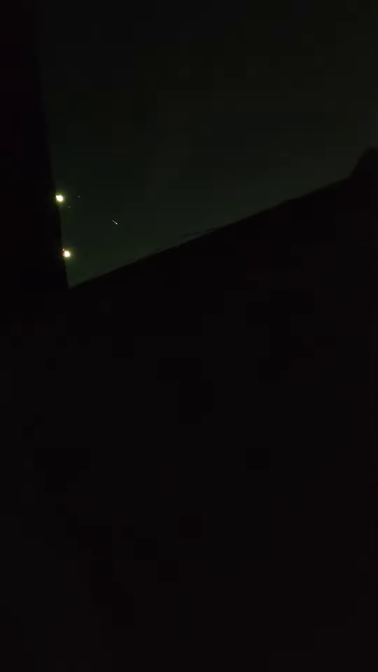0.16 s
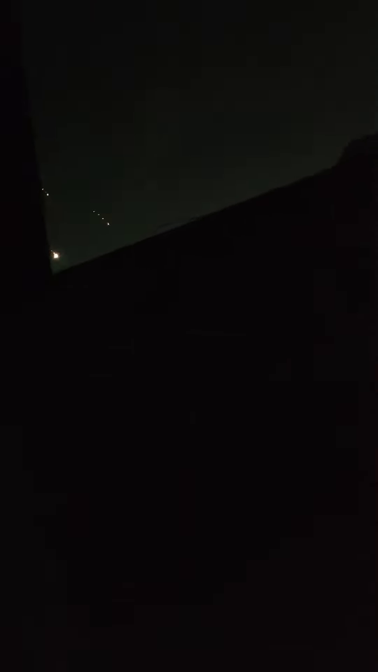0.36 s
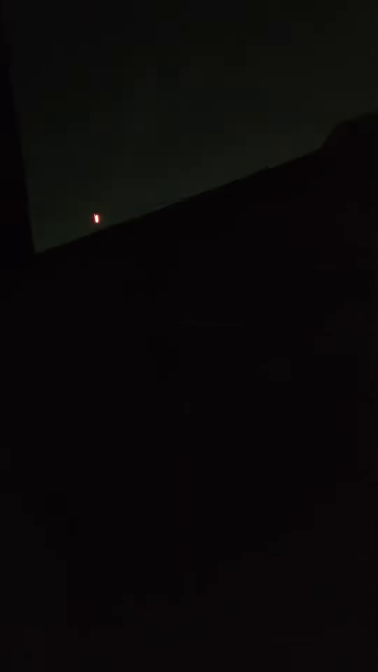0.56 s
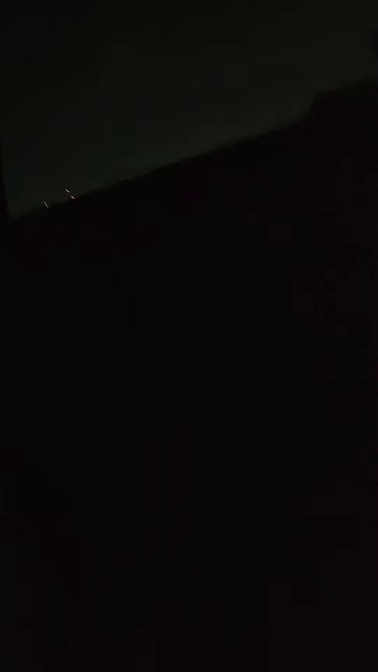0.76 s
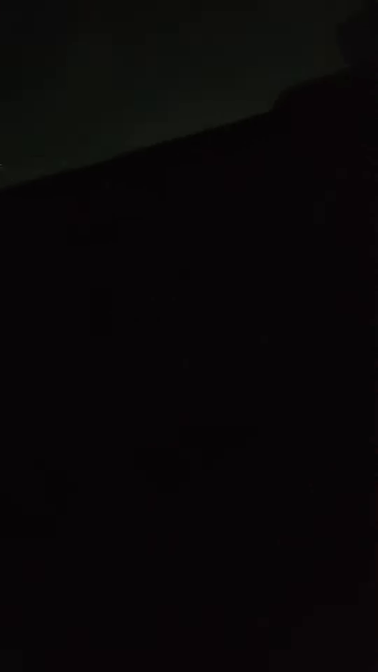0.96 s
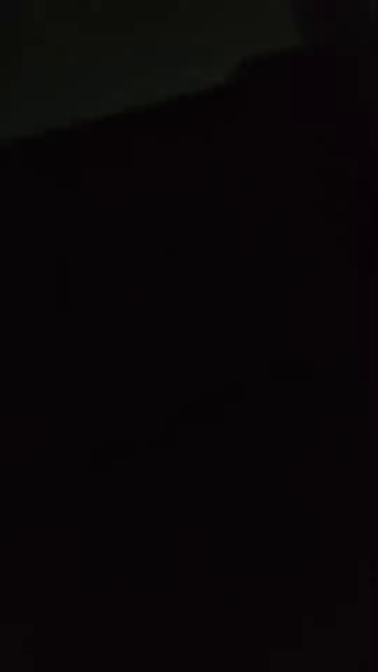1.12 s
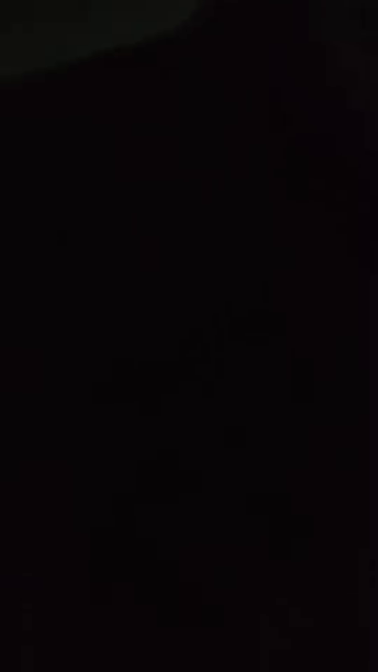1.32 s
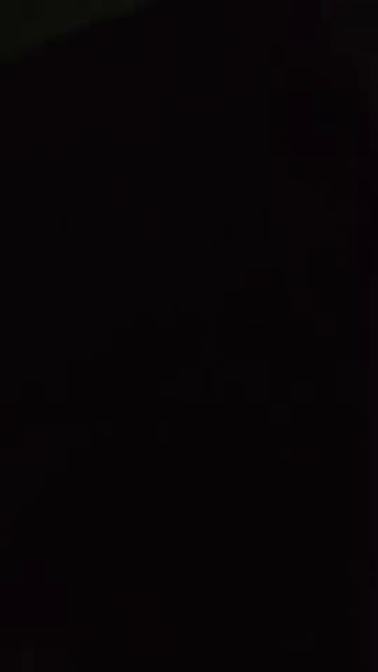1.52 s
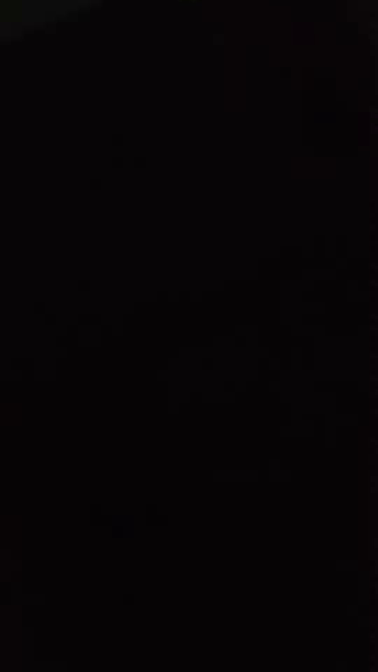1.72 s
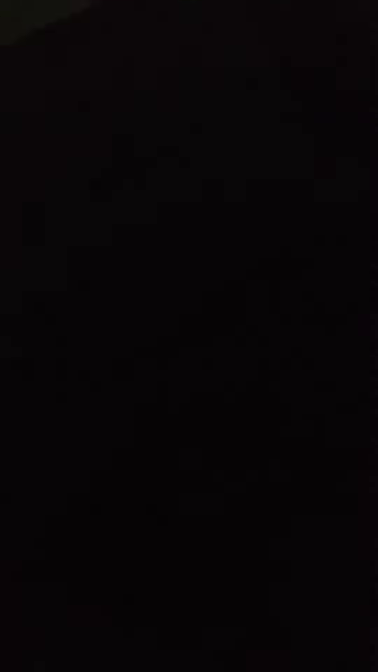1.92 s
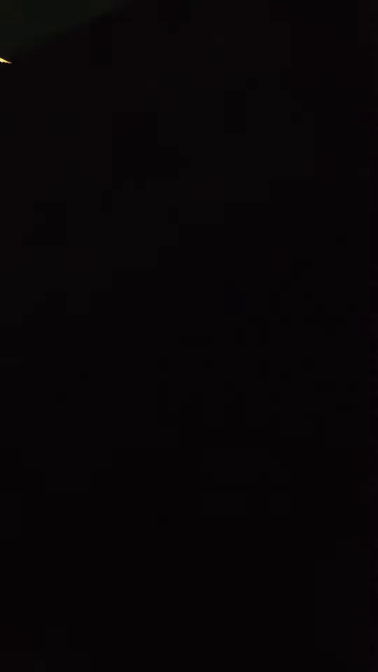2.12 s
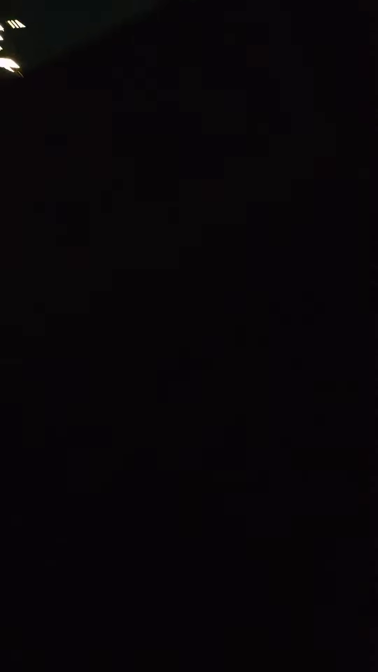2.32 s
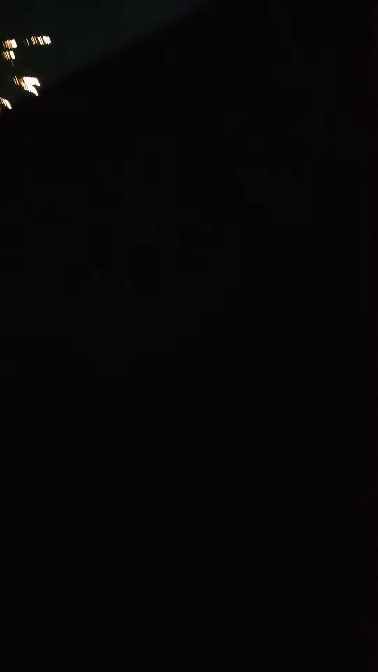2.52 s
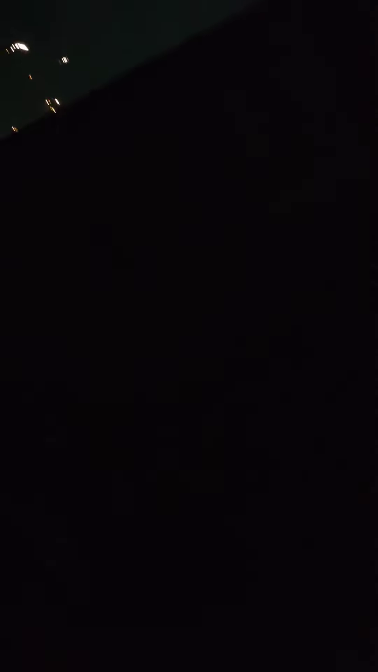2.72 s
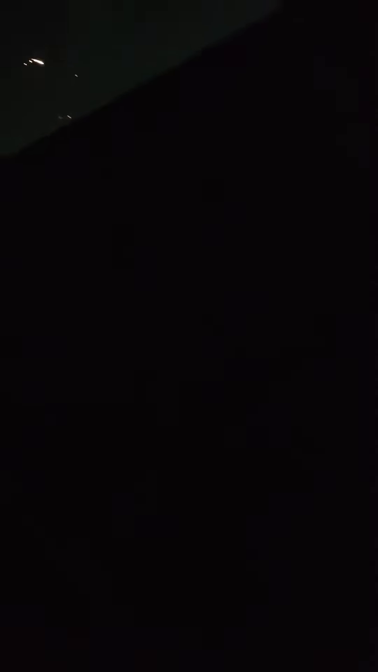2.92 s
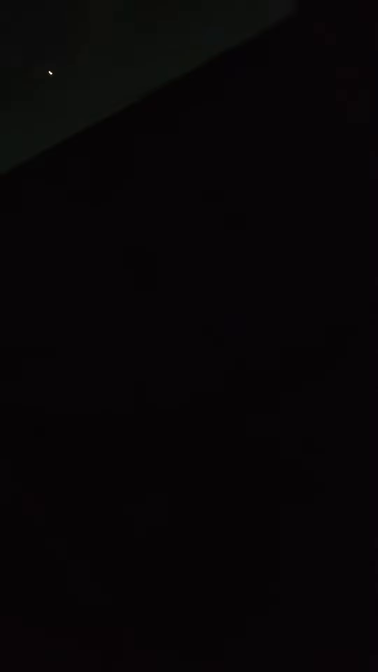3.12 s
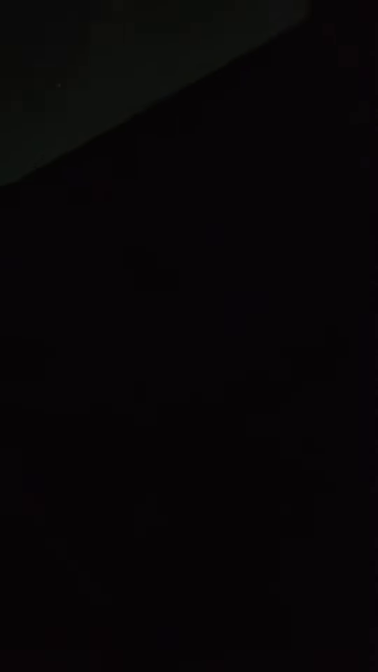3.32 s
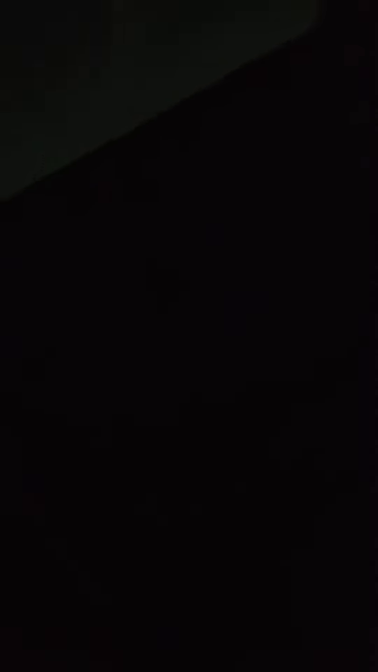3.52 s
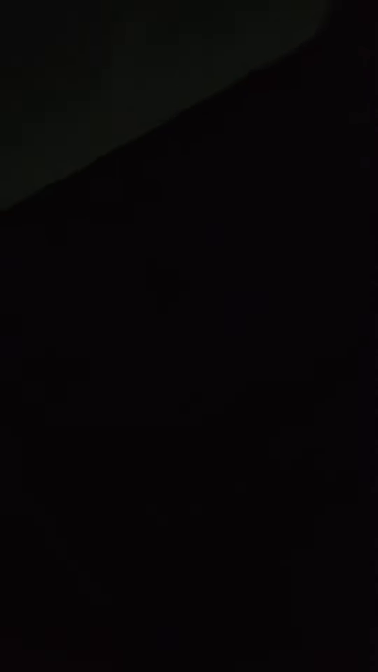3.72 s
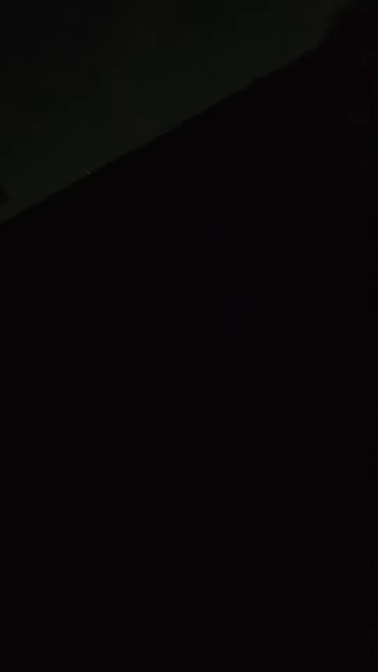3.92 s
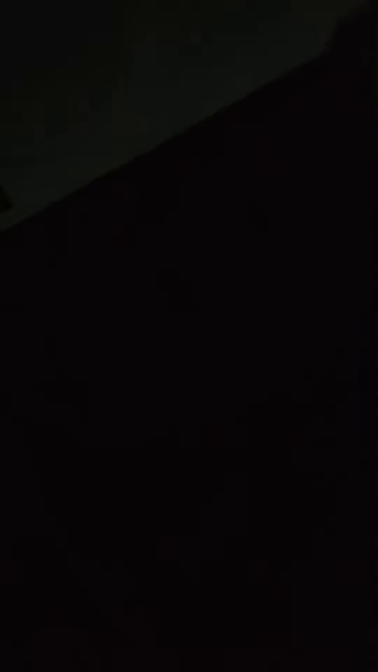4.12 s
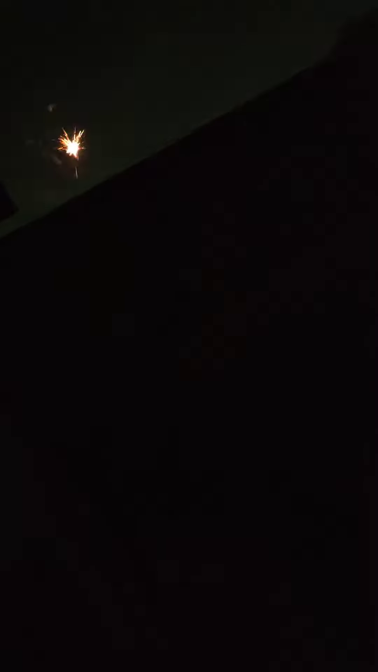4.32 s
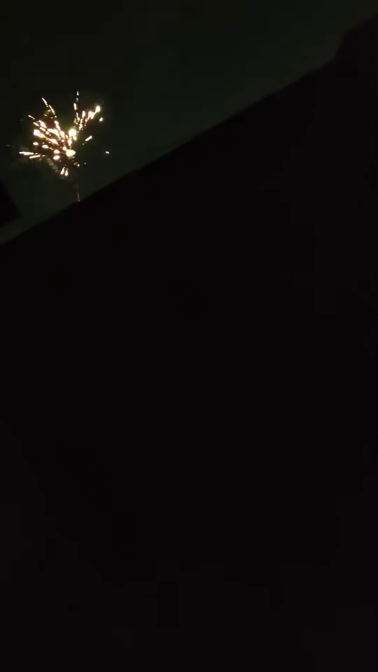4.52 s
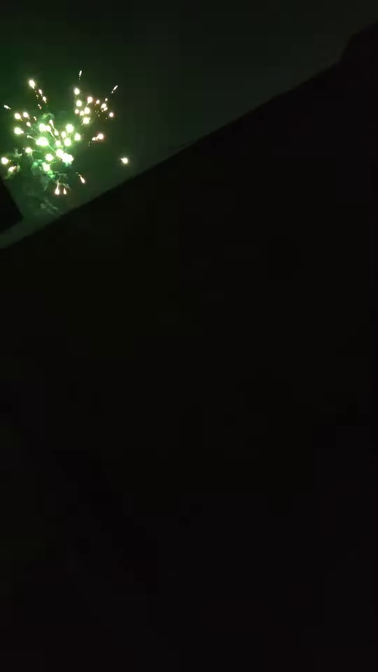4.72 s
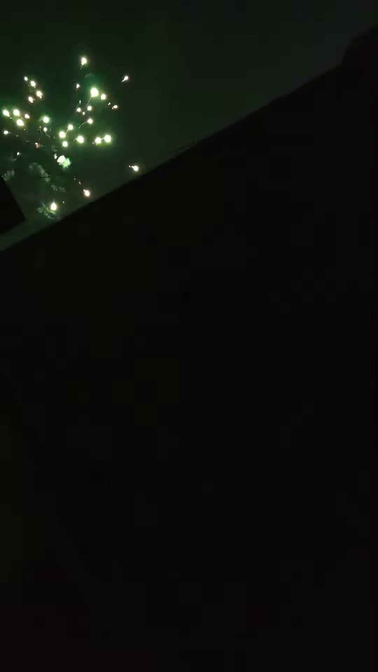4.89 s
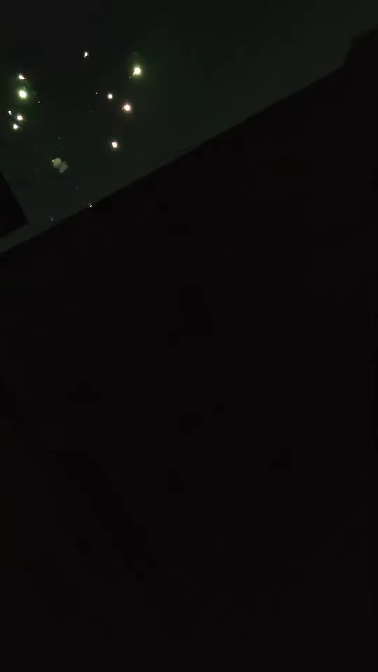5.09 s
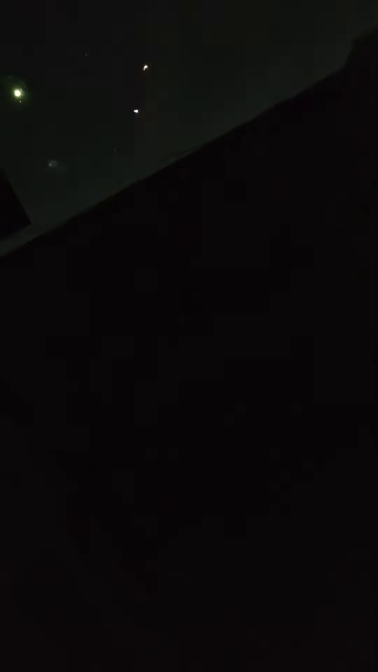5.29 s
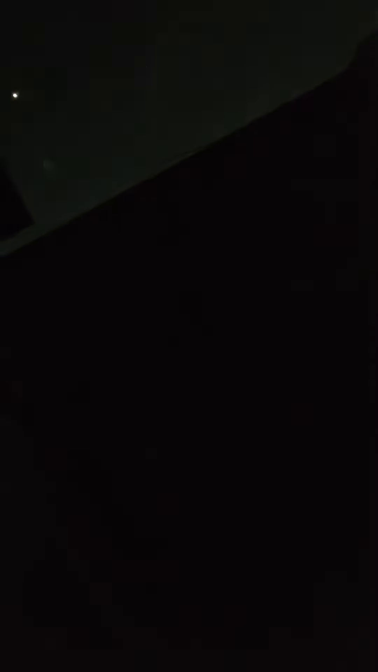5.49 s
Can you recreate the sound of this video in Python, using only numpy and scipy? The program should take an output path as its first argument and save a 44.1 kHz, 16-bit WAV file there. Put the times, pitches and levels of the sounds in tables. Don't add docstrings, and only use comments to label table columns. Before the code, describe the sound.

Hand-held phone outdoors between blocks of flats. First fading echo tail, faint drone and a car's tyre hiss receding, then scratchy handling, clicks and a brief squeak close up. A sharp, clipping aerial bang follows, with rapid wall slaps and a bright swarm of reflections decaying into low rumble and faint far pops. Another, heavier bang repeats the pattern and is still echoing at the end.

```python
import sys
import numpy as np
from scipy import signal
from scipy.fft import rfft, irfft, next_fast_len
from scipy.io import wavfile
from scipy.ndimage import uniform_filter1d

SR = 44100
rng = np.random.default_rng(int(sys.argv[2]) if len(sys.argv) > 2 else 0)


def unload_wav(signal):
    wavfile.write(
        sys.argv[1],
        SR,
        np.round(np.clip(np.atleast_2d(signal).T, -1, 1) * 32767).astype(np.int16),
    )


def ratio_of_db(decibels):
    return 10 ** (np.asarray(decibels, float) / 20)


N = 244755

# direct_boom_db, crack_minus_boom_db, echo_level_db, echo_brightness_db
BURSTS = [
    (0, -8, -1.5, -1.5),
    (0.5, -6, 0, 0.5),
    (2.5, -9.5, 0, 0),
]
BURST_S = [
    -1.297,
    1.937,
    4.513,
]


def band(x, lo_hz, hi_hz, order=2):
    return signal.sosfilt(signal.butter(order, [lo_hz, min(hi_hz, .45 * SR)], "band", fs=SR, output="sos"), x)


def unit(x):
    return x / np.sqrt(np.mean(x ** 2))


def sides(pan_db):
    return ratio_of_db(np.array([pan_db, -pan_db]) / 2).reshape(2, -1)


def colour(table, hz):
    return np.interp(np.log(hz), np.log(np.array(table)[:, 0]), np.array(table)[:, 1])


def walk(rate_hz):
    k = int(SR / rate_hz)
    held = np.repeat(rng.standard_normal(N // k + 1), k)
    return 1.207 * uniform_filter1d(uniform_filter1d(held, k), k)[:N]


def arrivals(at, size, lag, length):
    out = np.zeros((2, length + 64))
    for side, shift in zip(out, (lag / 2, -lag / 2)):
        np.add.at(side, np.clip(at + 16 + shift, 0, length).astype(int), size)
    return out[:, 16:length + 16]


def add(out, s, piece):
    i = int(s * SR)
    out[:, i:i + piece.shape[1]] += piece[:, :N - i]


def scattered_shock(crack_db, sizzle_db, hz):
    scatter_ms = 3.3
    u = rng.random((160, 3)).T
    late = -np.log(u[0]) * scatter_ms * SR / 1000
    size = np.where(u[1] < .3, -1, 1) * (1.8 + u[1])
    late[:8] *= .04
    late[60:] *= 4.0
    size[60:] *= .25
    hits = arrivals(late, size, 12 + 10 * (2 * u[2] - 1), 8192)
    n_wave = np.linspace(1, -1, int(.65 * SR / hz))
    boom = band(signal.lfilter(n_wave, 1, hits), hz / 1.35, hz * 2.8)
    crack = band(band(hits, 900, 2600, order=1), 700, 7000)
    sizzle = band(hits, 6000, 18000)
    layers = (boom, 0), (crack, crack_db + 4), (sizzle, sizzle_db + 2.5)
    return sum(ratio_of_db(db) * x / np.abs(x).max() for x, db in layers)


def fronts():
    # delay_s, boom_db, crack_minus_boom_db, sizzle_minus_boom_db, boom_hz
    walls = [(.017, -0.5, -17, -33, 390), (.056, 1, -7, -11.5, 597), (.075, -4.5, -6.5, -25, 282),
             (.116, -7.5, -6.5, -16, 560), (.177, -10.5, -23, -28, 506), (.237, -8, -11, -36, 520),
             (.443, -15, -17.5, -31.5, 530), (.530, -10, -12.5, -42, 520), (.662, -13.5, -13.5, -60, 340),
             (1.554, -16.5, -21, -38, 320), (1.599, -27.5, -29, -38, 410), (1.617, -22.5, -15, -36, 294),
             (1.660, -24, -17, -45, 340)]
    # start_s, boom_db, crack_minus_boom_db, boom_hz
    strays = [(0.485, -35.5, -0.5, 596), (1.964, -6.5, -6, 770), (2.0, -7.5, -4.5, 690),
              (2.043, -10.5, -11, 292), (3.083, -28, -10, 570), (3.119, -29, -9, 550),
              (3.3, -18.5, -20.5, 596), (3.378, -26, -15, 446), (3.425, -34, -12, 400),
              (3.439, -27.5, -6, 500), (3.689, -40, -21, 367), (4.279, -40, -17, 568),
              (4.297, -38, -3.5, 700), (4.377, -42, -9, 700), (4.46, -36, -17, 372),
              (4.545, -3.5, -11, 530), (4.629, -3.5, -11.5, 543), (4.646, -7.5, -31, 506),
              (5.155, -16, -6.5, 513), (5.207, -13, -11, 646), (5.383, -12.5, -18, 270)]
    stray_sizzle_db, direct_sizzle_db, direct_hz = -31, -14.5, 340
    out = np.zeros((2, N))
    rows = [(s, db, crack_db, stray_sizzle_db, hz) for s, db, crack_db, hz in strays]
    for s, (direct_db, crack_db, echo_db, _) in zip(BURST_S, BURSTS):
        rows.append((s, direct_db, crack_db, direct_sizzle_db, direct_hz))
        rows += [(s + lag, db + echo_db, *tone) for lag, db, *tone in walls]
    for s, boom_db, *tone in rows:
        if 0 <= s < N / SR:
            level_db = boom_db + .5 * max(boom_db + 12.0, 0)
            add(out, s, scattered_shock(*tone) * ratio_of_db(level_db) * sides(0.48))
    return out


def echo_power(t, hz):
    # delay_s, level_db
    district = [(0, -17.5), (.18, -20.5), (.33, -22), (.45, -24), (.66, -25), (.83, -31.5), (1.1, -36.5),
                (1.32, -42.5), (1.48, -39.5), (1.58, -37), (1.68, -40.5), (1.85, -46), (2.2, -54),
                (3.2, -51)]
    # pitch_hz, first_db, slope_db_per_s, lowest_db
    air = [(110, -7, -22, -15.5), (451, -5, 0, -5), (2510, -18, -1, -20), (7600, -31, -22.5, -47.5)]
    # delay_s, level_db, fade_db_per_s
    far_blocks = [
        (.87, -34.5, -57),
        (1.21, -39, -72),
        (1.57, -34.5, -74),
    ]
    # start_s, level_db, fade_db_per_s, brightness_db
    far_shells = [
        (-.01, -33, -90, 3.5),
        (-.01, -44, -11, 7.5),
        (4.27, -43, -32, -9),
        (5.24, -41, 10, 7),
    ]
    rumble_hz, rumble_db_per_octave, rumble_rise_db_per_s = 320, -11, 155

    def through_air(age):
        total = 0
        for i, (_, first_db, slope, lowest_db) in enumerate(air):
            weight = colour([(row[0], j == i) for j, row in enumerate(air)], hz)
            total = total + weight * np.maximum(first_db + slope * age, lowest_db)
        return total

    treble = np.clip(np.log(hz / air[1][0]) / np.log(air[2][0] / air[1][0]), 0, 1.7)
    power = 0
    for s, (_, _, echo_db, bright_db) in zip(BURST_S, BURSTS):
        decay_db = np.interp(t - s, *np.transpose(district)) + through_air(t - s)
        power = power + (t >= s) * ratio_of_db(decay_db + echo_db + treble * bright_db) ** 2
        for lag, db, fade in far_blocks:
            age = t - s - lag
            swell_db = np.minimum(fade * age, rumble_rise_db_per_s * age)
            tilt_db = rumble_db_per_octave * abs(np.log2(hz / rumble_hz))
            power = power + ratio_of_db(db + echo_db + swell_db + tilt_db) ** 2
    for s, db, fade, bright_db in far_shells:
        level_db = db + fade * (t - s) + treble * bright_db + through_air(N / SR)
        power = power + (t >= s) * ratio_of_db(level_db) ** 2
    return power


def swarm():
    # pitch_hz, level_db
    swarm_colour = [(30, -17.5), (60, -5), (120, 0), (220, -2), (320, 0), (520, 1), (800, 3), (1200, 2.5),
                    (1800, 1.5), (3000, 6.5), (5000, 8.5), (8000, 11.5), (14000, -3)]
    t, out, size_fft = np.arange(N) / SR, 0, next_fast_len(N)
    u = rng.random((60000, 5)).T
    size = np.sign(u[1] - .5) * ratio_of_db(np.minimum(-2.2 * np.log(u[2]), 14))
    grains = rfft(arrivals(u[0] * N, size, 11 + 24 * (u[3] + u[4] - 1), N), size_fft)
    octave = np.log2(np.arange(grains.shape[1]) * SR / size_fft + 1)
    patch = walk(24.83)
    for hz in 35 * 2 ** np.arange(0, 9, .5):
        gain = np.repeat(np.sqrt(echo_power(t[::16], hz)), 16)[:N]
        window = np.cos(np.pi * np.clip(octave - np.log2(hz), -.5, .5)) ** 2
        part = irfft(grains * window, size_fft)[:, :N]
        level_db = colour(swarm_colour, hz) + min(hz / 700, 1) * 1.96 * patch + 0.48 * walk(20)
        out = out + gain * ratio_of_db(level_db) * unit(part)
    return out * sides(-0.16)


def rustle():
    # peak_s, level_db, build_up_db_per_s, low_minus_high_band_db, left_minus_right_db
    strokes = [(0.0, -67, 100, 12, -5), (.21, -62, 150, 6, 5), (.31, -60, 40, 2, 5), (.70, -74, -4, 1, -1),
               (.832, -64, 190, -3, 4), (1.006, -61.5, 120, -0.5, 4), (1.082, -57.5, 70, -1, 2),
               (1.348, -50.5, 79, 1, 0.5), (1.445, -63.5, 55, 4.5, 3), (1.465, -67, 100, 11, 2),
               (1.75, -71, 40, 13, 0)]
    stop_db_per_s = 152
    t = np.arange(N) / SR
    rub = rng.standard_normal((2, N)) * ratio_of_db(2.0 * rng.exponential(size=(2, N)))
    high = unit(band(rub, 6100, 20300))
    low = unit(band(rub, 3400, 5800, order=1))
    power = np.zeros((2, 2, N))
    for s, db, build, low_db, pan_db in strokes:
        shape_db = np.minimum(build * (t - s), stop_db_per_s * (s - t) - 60 * (t > s + 1))
        gain = ratio_of_db(db + shape_db) * sides(pan_db)
        power += gain ** 2 * ratio_of_db(np.array([0, low_db - 2.5]))[:, None, None] ** 2
    return (np.sqrt(power[0]) * high + np.sqrt(power[1]) * low) * ratio_of_db(walk(73))


def handling():
    # start_s, peak_db, body_minus_peak_db, left_minus_right_db
    ticks = [(0.1999, -40, -11, -3), (0.2433, -41, -11, 8), (0.284, -35, -9, 1.5), (0.338, -42, -8, -4),
             (1.143, -55, 9, 5), (1.4363, -36.5, -3, -11), (1.4557, -41, -1, -1)]
    # start_s, pitch_hz, level_db, t60_s, left_minus_right_db
    knocks = [
        (1.124, 95, -18, .09, 5),
        (1.585, 830, -40, .07, 3),
        (1.02, 1400, -52, .3, 0),
    ]
    # pitch_hz, level_db
    squeak = [(1200, -43), (1280, -41), (1930, -49), (2570, -49)]
    squeak_s = 1.625
    out, age = np.zeros((2, N)), np.arange(4096) / SR
    for s, peak_db, body_db, pan_db in ticks:
        decay = np.exp(-age / 0.00043) + 0.076 * np.exp(-age / .006)
        burst = rng.standard_normal((2, len(age))) * decay
        body = ratio_of_db(body_db + 14) * band(burst, 700, 6800, order=1)
        add(out, s, ratio_of_db(peak_db - 2.0) * sides(pan_db) * (band(burst, 6400, 25000) + body))
    for s, hz, db, t60, pan_db in knocks:
        ring = np.sin(2 * np.pi * hz * age) * (1 - np.exp(-age / .008)) * ratio_of_db(-60 * age / t60)
        add(out, s, ratio_of_db(db) * sides(pan_db) * ring)
    rough = 0.83 + 0.5 * unit(band(rng.standard_normal(len(age)), 40, 230))
    swell = age / 0.024 * np.exp(1 - age / 0.014) * rough
    tone = sum(ratio_of_db(db) * np.sin(2 * np.pi * hz * age) for hz, db in squeak)
    add(out, squeak_s, sides(2.5) * swell * tone)
    return out


def engine_drone():
    # time_s, level_db
    drone_level = [
        [(0, -41), (1.9, -41.5)],
        [(2.6, -42), (4.45, -43)],
    ]
    s, db = np.transpose(np.vstack(drone_level))
    phase = np.cumsum(65 + 1.5 * walk(3)) * 2 * np.pi / SR
    mid, side = band(rng.standard_normal((2, N)), 70.1, 74.4)
    drone = np.sin(phase) * ratio_of_db(1.5 * walk(20)) + .3 * unit(mid) + .2 * unit(side) * np.array([[1], [-1]])
    return ratio_of_db(np.interp(np.arange(N) / SR, s, db)) * unit(drone)


def tyres():
    start_db, fade_db_per_s = -44.5, -10
    noise = unit(band(rng.standard_normal((2, N)), 950, 1440, order=3))
    return noise * ratio_of_db(start_db + fade_db_per_s * np.arange(N) / SR)


def murmur():
    # pitch_hz, level_db_per_hz
    town_spectrum = [(15, -38), (25, -17), (78, 0.5), (134, -5), (394, -11.5), (463, -30), (624, -25),
                     (1330, -24), (5880, -48.5), (14000, -70.5), (16000, -72)]
    out = 0
    for hz in 30 * 2 ** np.arange(0, 9.5, .5):
        mid, side = band(rng.standard_normal((2, N)), hz / 2 ** 0.33, hz * 2 ** 0.22)
        width = np.clip(0.043 + hz / 900, 0, 1)
        level_db = colour(town_spectrum, hz) + 0.5 * walk(7.9)
        out = out + ratio_of_db(level_db) * (mid + width * side * np.array([[1], [-1]]))
    return ratio_of_db(-43) * unit(out)


def scene():
    return fronts() + swarm() + rustle() + handling() + engine_drone() + tyres() + murmur()


def top_cut(x):
    return signal.sosfilt(signal.butter(12, 16970, fs=SR, output="sos"), x)


def record(dry):
    # start_s, push_full_scale, length_s, slip_full_scale
    shoves = [
        (1.9367, -2.0, .056, 0),
        (1.9577, -.8, .035, .5),
        (4.5698, -.85, .04, 0),
    ]
    stop, ceiling = .95, .93
    coupling_hz, hiss_db, top_hz = 49.6, -75, 16000
    push, slip = np.zeros((2, 2, N))
    for s, depth, length, shift in shoves:
        age = np.arange(N) / SR - s
        onset = np.clip(age / .0004, 0, 1)
        push[1] += depth * onset * np.clip(1 - (age / length) ** 2, 0, 1)
        slip[1] += shift * onset * np.clip((length - age) / .009, 0, 1)
    x = np.clip(dry + push, slip - stop, stop)
    for hz in (coupling_hz, 14):
        x = signal.sosfilt(signal.butter(1, hz, "high", fs=SR, output="sos"), x)
    x = x / (1 + (x / ceiling) ** 6) ** (1 / 6)
    x = x + ratio_of_db(hiss_db) * signal.lfilter([1, -.55], 1, rng.standard_normal(x.shape))
    x = signal.sosfilt(signal.ellip(4, 1, 20, top_hz, fs=SR, output="sos"), x)
    return top_cut(x)


dry = scene()
out = record(dry)
unload_wav(out)
```